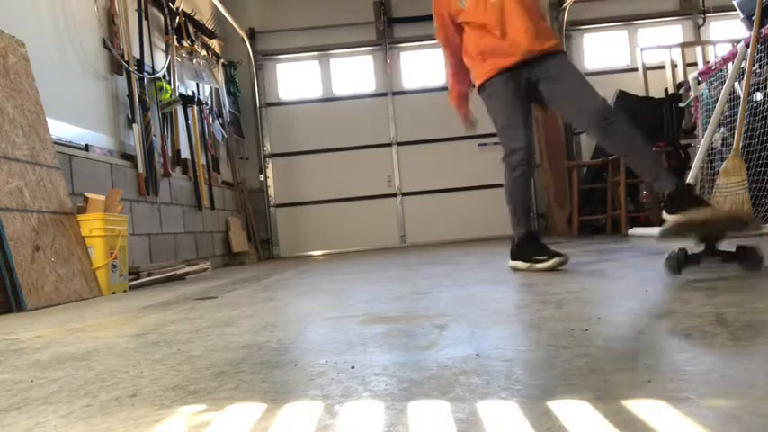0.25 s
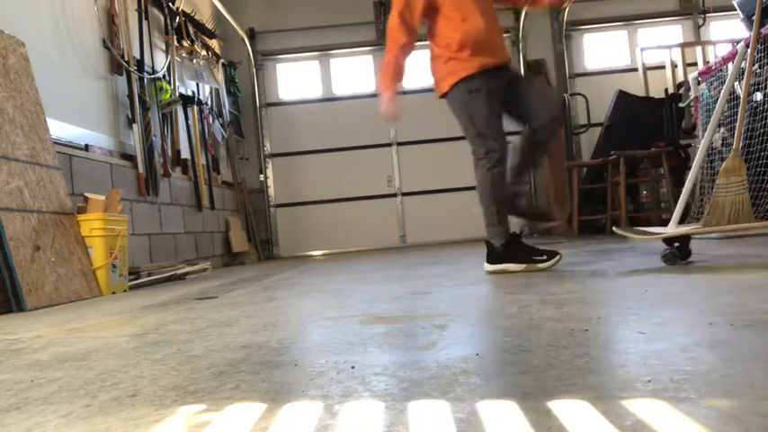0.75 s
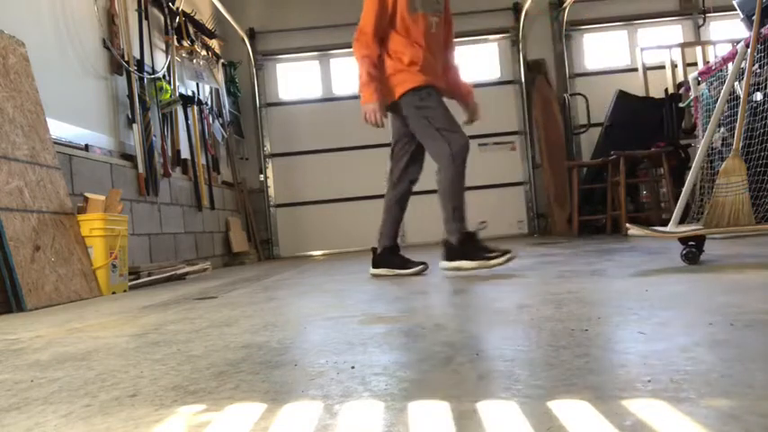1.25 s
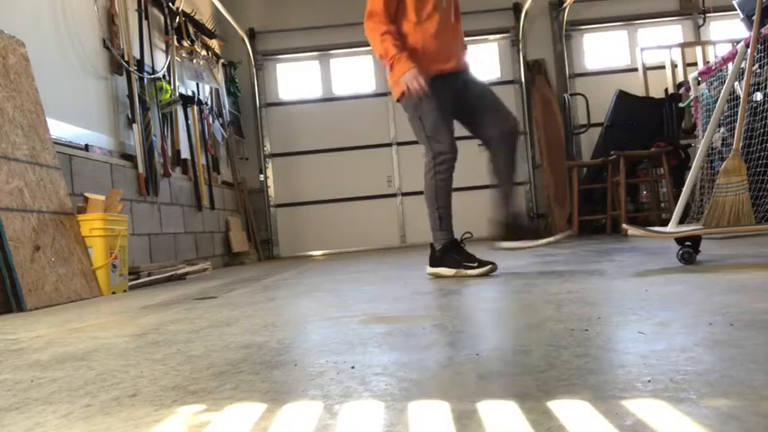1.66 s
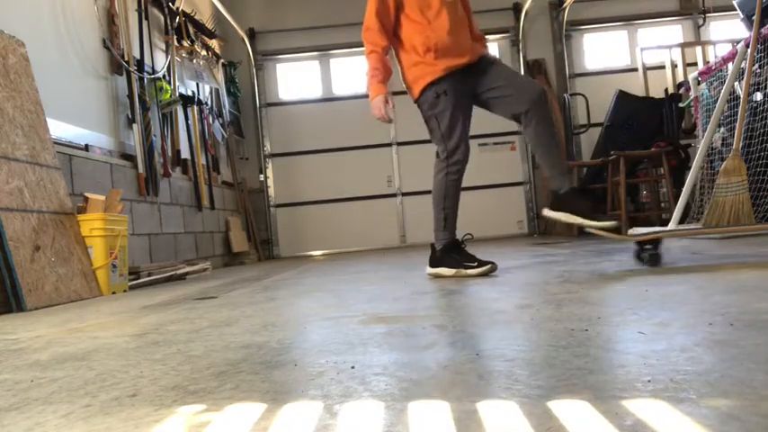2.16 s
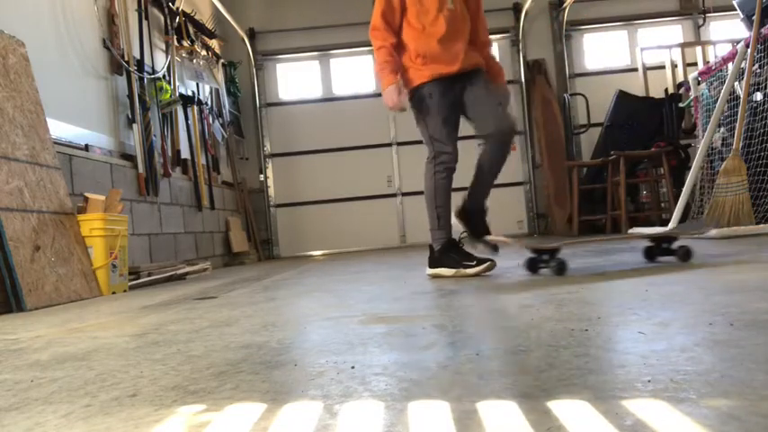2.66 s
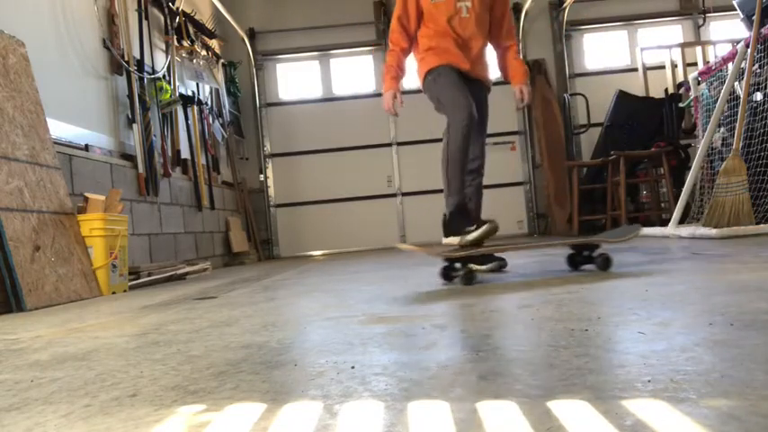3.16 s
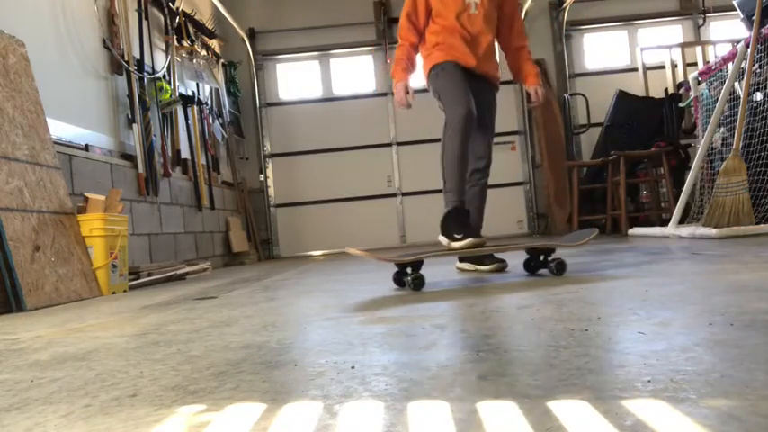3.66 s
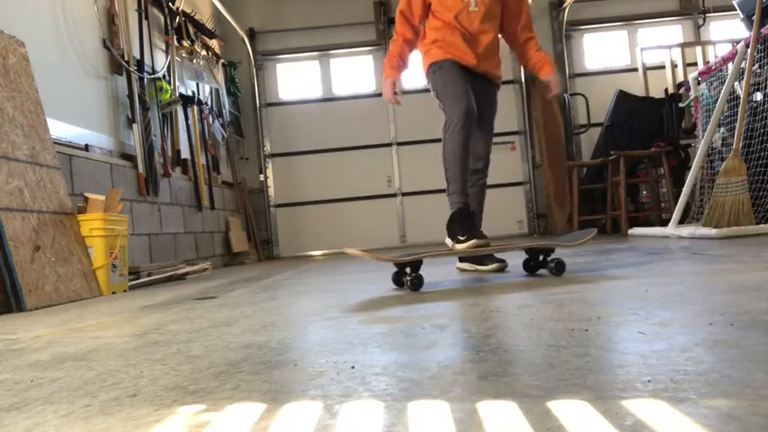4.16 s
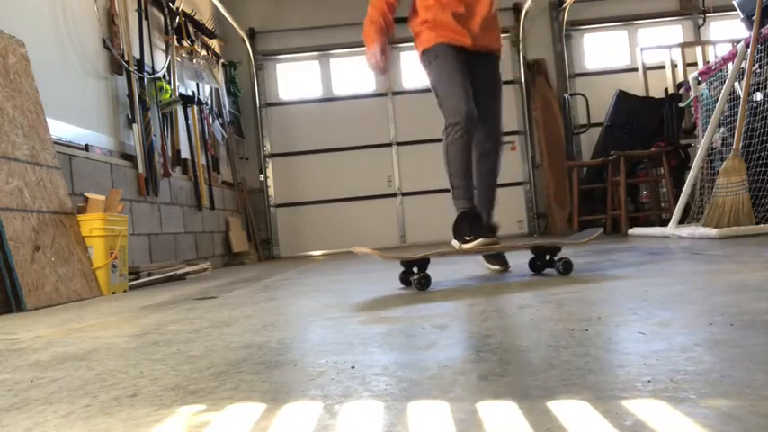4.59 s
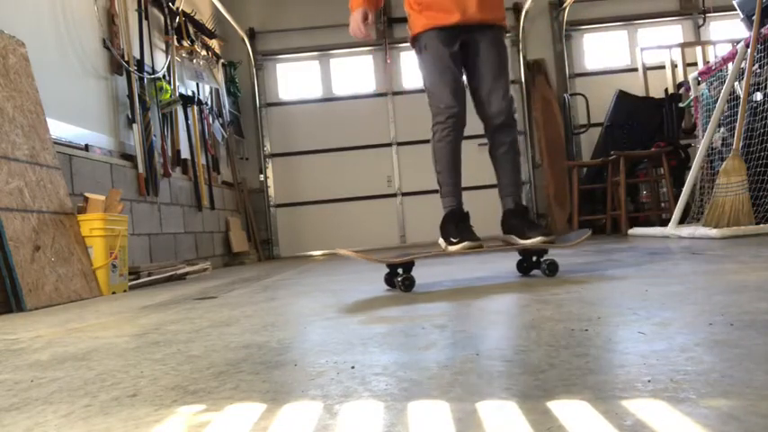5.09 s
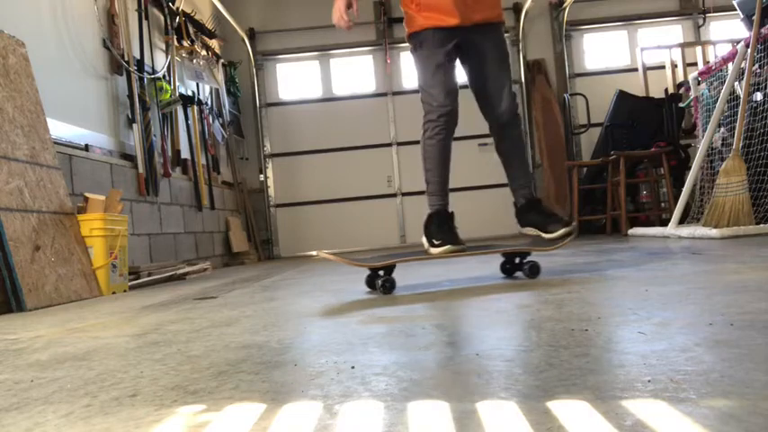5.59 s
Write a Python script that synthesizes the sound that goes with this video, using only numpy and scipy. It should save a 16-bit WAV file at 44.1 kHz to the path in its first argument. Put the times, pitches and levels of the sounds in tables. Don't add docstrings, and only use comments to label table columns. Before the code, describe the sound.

Two modest taps and a shoe scuff lead to one dominant, bright skateboard slam, its wooden deck and a hollow stand ringing amid rapid bounces. The echo fades over about a second. Then come sparse knocks, quiet rolling, metallic chatter and, near the end, a medium clunk as a foot steps on the board. Mono phone sound, limited bass, low outdoor hum.

```python
import sys
import numpy as np
from scipy import signal
from scipy.io import wavfile
from scipy.ndimage import uniform_filter1d

SR = 44100
rng = np.random.default_rng(int(sys.argv[2]) if len(sys.argv) > 2 else 0)


def ratio(d):
    e = np.asarray(d, float) / 20
    return 10 ** e


def master_out(mix):
    frames = np.transpose(np.atleast_2d(mix))
    ceiling = np.clip(frames, -1, 1)
    pcm = np.round(ceiling * 32767).astype(np.int16)
    wavfile.write(sys.argv[1], SR, pcm)


N = 257103

# start in seconds, crack peak in dB, contact time in ms,
# deck thud in dB, wood ring in dB.
KNOCKS = [
    (0.0699, -25.5, 0.63, -30, -45),
    (0.1974, -31.5, 0.64, -30, -38.5),
    (0.5549, -5, 0.52, -9.5, -14.5),
    (0.6895, -12.5, 0.67, -16.5, -16),
    (1.1986, -30.5, 1, -41, -42),
    (1.7242, -41, 0.76, -36.5, -54),
    (1.9044, -24, 0.64, -27, -29.5),
    (2.59, -25, 0.7, -39, -39),
    (3.239, -33.5, 0.64, -38.5, -35),
    (4.7057, -20, 0.63, -22, -30),
]
# frequency in Hz, level in dB, t60 in seconds.
THUD_MODES = [(140.6, 3, 0.15), (108.2, -12.5, 0.17), (83.8, -20, 0.23), (230.4, -11, 0.26)]
# frequency in Hz, level in dB, t60 in seconds.
WOOD_MODES = [(486.7, -10, 0.06), (538, 3.5, 0.079), (581.8, -9.5, 0.15), (610.7, 6.5, 0.068),
              (659.2, -1.5, 0.043), (695, 6.5, 0.062), (764, -1.5, 0.041), (851.3, 0, 0.078)]
# frequency in Hz, level in dB, t60 in seconds.
HIGH_MODES = [(994.6, -3, 0.046), (1075.6, -6.5, 0.076), (1139, -18.5, 0.22), (1227.5, -12.5, 0.098),
              (1345, -0.5, 0.019), (1420, 0, 0.021), (1627, -5.5, 0.04), (1965, -10, 0.042),
              (2240, -20, 0.024), (2490, -8.5, 0.017)]


def evened(x):
    return x / np.sqrt(np.mean(x ** 2) + 1e-20)


def read(points, hz):
    f, value = np.transpose(points)
    return np.interp(np.log(hz + 1), np.log(f + 1), value)


def add(mix, s, sound):
    part = mix[round(s * SR):][:len(sound)]
    part += sound[:len(part)]


def band(x, lo_hz, hi_hz, order=2):
    edges_hz = [lo_hz, min(hi_hz, SR / 2.1)]
    return signal.sosfilt(signal.butter(order, edges_hz, "band", fs=SR, output="sos"), x)


def clumped(x, depth_db, size):
    drift = uniform_filter1d(rng.standard_normal(x.shape), size=size)
    return x * ratio(depth_db * evened(drift))


def swell(s, rise_s, fall_s):
    t = np.arange(N) / SR - s
    return ratio(-20 * np.maximum(-t / rise_s, t / fall_s))


def ring(modes, t, balance_db, rise_s):
    out = np.zeros(len(t))
    for (hz, db, t60), shift_db in zip(modes, balance_db):
        out += ratio(db + shift_db - 60 * t / t60) * np.sin(2 * np.pi * hz * t)
    out = out * (1 - np.exp(-t / rise_s)) ** 2
    return out / abs(out).max()


def cracks():
    out, t = np.zeros(N), np.arange(SR // 50) / SR
    for s, db, contact_ms, *_ in KNOCKS:
        u = t * 1000 / contact_ms
        turns = 0.3 * u + 2.1 * (1 - np.exp(-u / 2.1))
        envelope = (u / 1.83) * np.exp(1 - u / 1.25)
        add(out, s + 0.00059, -ratio(db + 6.5) * np.sin(2 * np.pi * turns) * envelope)
    slab = np.roll(band(out, 250, 880, order=3), -SR // 220)
    return out + ratio(-28) * slab


def knocks():
    # start in seconds, high ring peak in dB, deck thud in dB,
    # wood ring in dB.
    cushioned = [(0.0, -44, -36.5, -55), (0.1062, -39, -43, -45), (0.3002, -29.5, -39.5, -48),
                 (0.5795, -20, -12, -19), (0.6, -8, -31, -16.5), (0.6396, -22, -44, -21.5),
                 (0.7197, -9, -45, -32), (0.7444, -17.5, -27, -18.5), (0.7749, -44, -28, -36),
                 (0.799, -36.5, -29.5, -29), (0.8594, -22.5, -38.5, -30.5), (0.9502, -28.5, -57, -37),
                 (1.0285, -29, -63, -51), (1.0894, -37, -68, -43), (1.2726, -34.5, -44, -50),
                 (1.7573, -34.5, -53, -42.5), (1.959, -30, -48, -31.5), (2.0128, -32.5, -48, -41),
                 (2.099, -42, -46, -42), (2.2282, -33.5, -46, -50), (2.3412, -41, -40, -60),
                 (2.4594, -44, -40, -68), (2.8548, -46, -41.5, -47.5), (3.3034, -30.5, -35.5, -42),
                 (3.3697, -35, -41, -49), (3.8852, -38, -49, -46.5), (4.0051, -38.5, -60, -49),
                 (4.7667, -27.5, -33, -36), (5.593, -43.5, -49, -52)]
    # frequency in Hz, level in dB, t60 in seconds.
    low_modes = [(355.2, -4.5, 0.15), (303.5, -1, 0.091), (436, -17.5, 0.33)]
    dull_db = 0.6
    blows = [(s, db - 13.5, thud_db, wood_db, 0) for s, db, _, thud_db, wood_db in KNOCKS]
    blows += [(s, db - 10.5, thud_db, wood_db, dull_db) for s, db, thud_db, wood_db in cushioned]
    rings, thuds = np.zeros((2, N))
    t = np.arange(SR // 2) / SR
    for s, high_db, thud_db, wood_db, loss_db in blows:
        spot = rng.standard_normal(10)
        high_balance_db = 2.8 * spot - loss_db * np.arange(10)
        low_db = (thud_db + wood_db) / 2 - 5.5
        add(rings, s, ratio(high_db) * ring(HIGH_MODES, t, high_balance_db, 0.0029))
        add(rings, s, ratio(wood_db + 1) * ring(WOOD_MODES, t, 1.1 * spot[::-1], 0.0014))
        add(rings, s, ratio(low_db) * ring(low_modes, t, 1.2 * spot, 0.0045))
        add(thuds, s, ratio(thud_db + 3) * ring(THUD_MODES, t, 2.2 * spot, 0.0115))
    return rings, thuds


def ticks():
    # start in seconds, snap peak in dB, top band in dB, length as t60 in seconds.
    contacts = [(0.0685, -24, -52, 0.026), (0.1, -23.5, -46, 0.028), (0.2988, -48, -59, 0.025),
                (0.5547, -1.5, -38, 0.04), (0.5663, -32, -30, 0.031), (0.6891, -11, -36, 0.028),
                (0.8115, -29, -41, 0.025), (1.197, -16.5, -31.5, 0.038), (1.9009, -28, -60, 0.075),
                (1.9694, -51, -52, 0.035), (2.0716, -49, -40, 0.033), (2.2104, -49, -43, 0.033),
                (2.2203, -33, -47, 0.03), (2.59, -23, -63, 0.022), (2.7647, -39, -42, 0.026),
                (3.237, -31, -51.5, 0.069), (3.4081, -40, -68, 0.066), (3.5128, -34, -58, 0.04),
                (3.919, -44, -75, 0.03), (4.058, -45, -75, 0.04), (4.3596, -34, -74, 0.022),
                (4.4614, -48, -51, 0.03), (4.652, -44, -72, 0.03), (4.7062, -19.5, -51, 0.056),
                (5.2254, -53, -60, 0.034), (5.5916, -36, -52, 0.04)]
    clicks, grit = np.zeros((2, N))
    t = np.arange(SR // 5) / SR
    for s, snap_db, top_db, t60 in contacts:
        impulse = 1.58 * (t == 0)
        burst = 0.6 * rng.standard_normal(len(t)) * ratio(-60 * t / t60)
        for mix, x in ((clicks, impulse), (grit, burst)):
            middle = band(x, 1420, 5860, order=3)
            top = 0.25 * band(x, 3670, 8700, order=3) + 1.03 * band(x, 9700, 24000, order=3)
            add(mix, s, ratio(snap_db - 10) * middle + ratio(top_db - 1.5) * top)
    return clicks, grit


def slides():
    # loudest moment in seconds, rise in seconds, fall in seconds, hiss in dB,
    # fineness of the grit in dB.
    strokes = [(0.0, .01, 0.091, -52.5, -0.5), (0.128, 0.077, 0.071, -42.5, 1.5),
               (0.304, 0.026, 0.089, -53.5, -9), (0.49, 0.056, .16, -42.5, 3),
               (0.559, 0.0059, 0.01, -30.5, -2), (0.86, 0.14, 0.078, -56, -0.5),
               (1.202, 0.0079, 0.054, -52.5, -10), (1.903, .004, 0.07, -57, -8),
               (2.07, 0.23, 0.15, -61.5, 0), (2.21, 0.22, 0.15, -59.5, 5), (2.59, 0.0017, 0.078, -43.5, 1),
               (3.245, 0.009, .11, -56, -7), (3.516, .01, 0.066, -58.5, 4), (4.713, .004, 0.1, -50.5, -5.5),
               (5.07, .04, 0.15, -59, -5), (5.23, 0.022, 0.058, -60.5, -4), (5.594, 0.063, 0.064, -59, -5)]
    out = np.zeros(N)
    grains = rng.standard_normal((3, N)) * ratio(4.9 * np.minimum(rng.exponential(1, N), 4))
    hiss = evened(band(grains[0], 4800, 8500))
    top = evened(band(grains[1], 10000, 16500))
    scrape = band(grains[2], 1910, 4410, order=3)
    rubber = 1.3 * band(scrape, 2320, 2370) + 0.28 * band(scrape, 4920, 4930)
    scrape = evened(scrape + rubber)
    for s, rise_s, fall_s, db, fine_db in strokes:
        grit = hiss + ratio(fine_db - 1) * top + ratio(-3.5 - 1.28 * fine_db) * scrape
        out += ratio(db - 8.5) * swell(s, rise_s, fall_s) * grit
    return out


def rattles():
    # start in seconds, rattle in dB, length as t60 in seconds, dullness in dB per mode.
    jolts = [
        (0.558, -40, 0.34, -1),
        (2.591, -56, 0.36, -1.5),
        (3.512, -50.5, 0.11, -1),
        (4.362, -70, .03, -1.2),
        (4.711, -52.5, 0.25, -2.2),
    ]
    # frequency in Hz, level in dB, t60 in seconds.
    metal_modes = [(1830, -2, .009), (2300, 1.5, .011), (3260, -1.5, .007), (3570, -1.5, .007),
                   (4280, -0.5, .008), (4470, -4, 0.0086), (5103, -4, 0.0082), (5740, -11, 0.0067)]
    out, t, short = np.zeros(N), np.arange(SR // 2) / SR, np.arange(SR // 10) / SR
    for s, db, t60, dull_db in jolts:
        taps = rng.standard_normal(len(t)) * (rng.random(len(t)) < 700 / SR)
        taps[0] = 2.64
        metal = ring(metal_modes, short, -dull_db * np.arange(len(metal_modes)), 0.0001)
        swarm = evened(signal.fftconvolve(taps, metal)[:len(t)])
        add(out, s, ratio(db - 60 * t / t60) * swarm)
    return out


def rolling():
    # loudest moment in seconds, rise in seconds, fall in seconds, rumble in dB,
    # mid rattle against rumble in dB.
    passes = [(0.12, .12, 0.5, -33, -5), (0.2, 0.087, 0.13, -36, -23), (0.72, 0.16, 0.35, -30.5, 5.5),
              (1.07, 0.32, 0.91, -42.5, -14), (1.96, 0.27, 0.53, -36, -2), (2.35, .3, 0.25, -40.5, -26),
              (2.7, 0.18, .35, -42.5, -9), (3.3, 0.12, .12, -35, -8), (3.64, 0.32, 0.14, -42.5, -3),
              (3.95, 0.14, 0.42, -50, -0.5), (4.85, 0.52, 0.47, -38.5, -3.5),
              (5.25, 0.037, .12, -40.5, -12), (5.798, 0.66, .3, -53.5, -9)]
    out = np.zeros(N)
    short = np.arange(SR // 4) / SR
    rough = clumped(rng.standard_normal((3, N)), 2.5, 1800)
    thud = ring(THUD_MODES, 2.367 * short, [-9.5, 8.0, 14.5, 1], 0.0029)
    wood = ring(WOOD_MODES + HIGH_MODES, 2.5 * short, np.zeros(18), 0.0012)
    boom = evened(band(rough[0], 73, 127))
    rumble = evened(signal.oaconvolve(rough[1], thud)[:N])
    rattle = evened(signal.oaconvolve(rough[2], wood)[:N])
    for s, rise_s, fall_s, db, rattle_db in passes:
        wheels = ratio(-2) * boom + rumble + ratio(rattle_db) * rattle
        out += ratio(db - 12.5) * swell(s, rise_s, fall_s) * wheels
    return out


def trucks():
    # loudest moment in seconds, rise in seconds, fall in seconds, axle hum in dB,
    # kingpin chatter in dB.
    chatter = [
        (0.076, .005, 0.13, -50, -41),
        (0.21, 0.036, .2, -62, -41),
        (1.96, 0.067, 0.24, -32.5, -48),
        (2.128, .1, 0.071, -53, -70),
        (2.246, 0.16, 0.23, -73, -50),
    ]
    out = np.zeros(N)
    jolts = clumped(rng.standard_normal((2, N)), 1.86, 900)
    axle = evened(band(jolts[0], 630, 758))
    kingpin = evened(band(jolts[1], 990, 1162))
    for s, rise_s, fall_s, axle_db, kingpin_db in chatter:
        metal = ratio(axle_db - 7) * axle + ratio(kingpin_db - 0.5) * kingpin
        out += swell(s, rise_s, fall_s) * metal
    return out


def stand():
    # loudest moment in seconds, rise in seconds, fall in seconds, level in dB.
    hits = [
        (0.1, 0.018, 0.33, -46.5),
        (0.585, .02, 0.21, -21.5),
        (0.89, .07, .22, -37),
    ]
    pipe = evened(band(rng.standard_normal(N), 340, 368))
    return sum(ratio(db) * swell(s, rise_s, fall_s) * pipe for s, rise_s, fall_s, db in hits)


def grunts():
    # loudest moment in seconds, rise in seconds, fall in seconds, level in dB.
    shifts = [
        (4.364, .004, .35, -55),
        (5.229, .005, 0.17, -51),
        (5.64, .1, 0.3, -57),
    ]
    slips = clumped(rng.standard_normal(N), 3.5, 500)
    wood = evened(band(slips, 790, 1060))
    return sum(ratio(db) * swell(s, rise_s, fall_s) * wood for s, rise_s, fall_s, db in shifts)


def garage(x):
    # frequency in Hz, t60 in seconds.
    decay = [(80, 0.66), (250, 0.66), (1000, 0.71), (4000, 0.76), (8000, 0.77), (15000, 0.4)]
    # frequency in Hz, level in dB.
    colour = [(80, 1), (300, -1.5), (1000, 3), (2500, 5.5), (6000, 3), (15000, -2.5)]
    # delay in seconds, level in dB.
    echoes = [(.0028, -10.5), (.0082, -50), (0.015, -11), (0.023, -36.5), (0.025, -37)]
    taps = np.zeros(3 * SR // 2)
    at = np.arange(200, len(taps) - 10, 10)
    taps[at + rng.integers(0, 10, len(at))] = rng.choice([-1.0, 1.0], len(at))
    hz, t, z = signal.stft(taps, SR, nperseg=256)
    z = z * ratio(read(colour, hz)[:, None] - 60 * t / read(decay, hz)[:, None])
    tail = signal.istft(z, SR, nperseg=256)[1][:len(taps)]
    tail = tail * (1 - np.exp(-np.arange(len(tail)) / SR / 0.0056))
    tail = ratio(0.5) * tail / np.linalg.norm(tail)
    for s, db in echoes:
        add(tail, s, ratio([db]))
    return signal.fftconvolve(x, tail)[:N]


def hum():
    # frequency in Hz, level in dB per Hz.
    spectrum = [(15, -30), (53, 0), (97, -8.5), (180, 3), (300, -4.5), (476, -10.5), (840, -9),
                (1150, -12.5), (1500, -19.5), (4400, -25), (5100, -33), (7900, -35.5), (8700, -42),
                (16000, -43.5)]
    frames, hz = N // 512 + 5, np.fft.rfftfreq(2048, 1 / SR)
    a, b, patches = rng.standard_normal((frames, 1025, 3)).T
    patches = uniform_filter1d(patches, size=16, axis=0)
    patches = evened(uniform_filter1d(patches, size=10, axis=1))
    z = (a + 1j * b) * ratio(read(spectrum, hz)[:, None] + 1.26 * patches)
    return ratio(-50) * evened(signal.istft(z, nperseg=2048, noverlap=1536)[1][:N])


def scene():
    crack = cracks()
    rings, thuds = knocks()
    clicks, grit = ticks()
    scuffs = slides() + rattles()
    direct = 0.71 * crack + 0.79 * rings + 0.55 * thuds + 0.19 * clicks + 1.21 * grit + scuffs
    reflected = 0.38 * crack + rings + 0.076 * thuds + 2.17 * clicks + 0.25 * grit + scuffs
    resonances = rolling() + trucks() + stand() + grunts()
    return (direct + garage(reflected) + resonances + hum())[None]


def low_pass(x):
    return signal.sosfilt(signal.butter(12, 16600, fs=SR, output="sos"), x)


def record(dry):
    cut = signal.sosfilt(signal.butter(4, 41, "high", fs=SR, output="sos"), dry)
    edge = signal.firwin(401, 15950, window=("kaiser", 8), fs=SR)
    return low_pass(signal.oaconvolve(cut, edge[None], "same"))


dry = scene()
out = record(dry)
master_out(out)
```